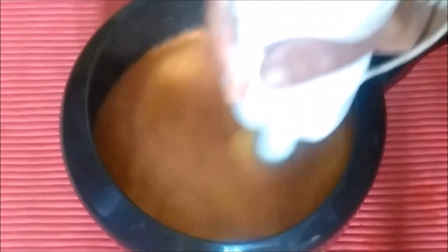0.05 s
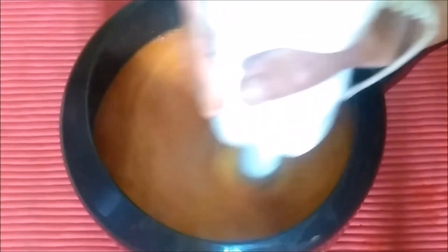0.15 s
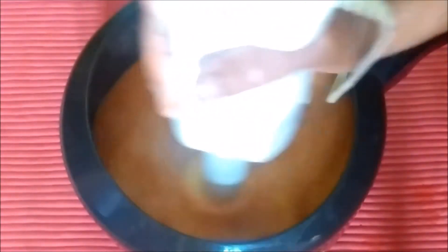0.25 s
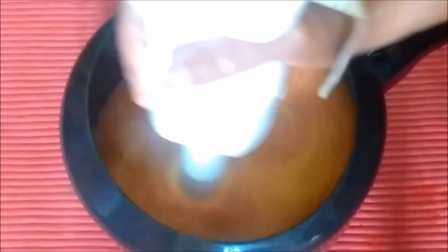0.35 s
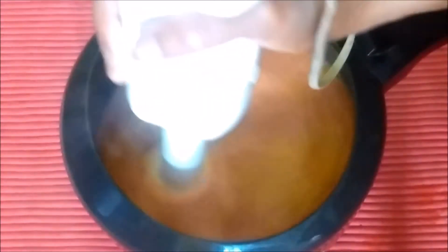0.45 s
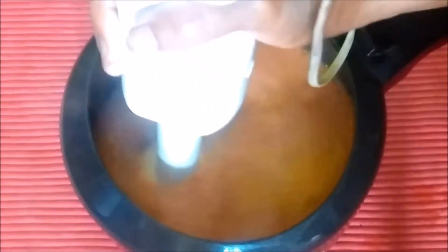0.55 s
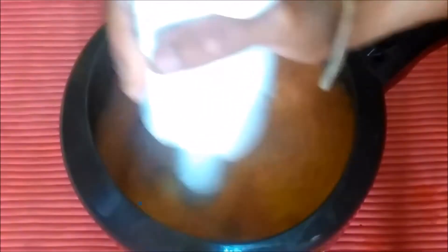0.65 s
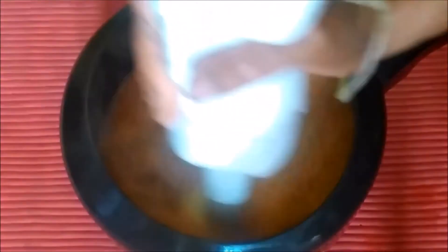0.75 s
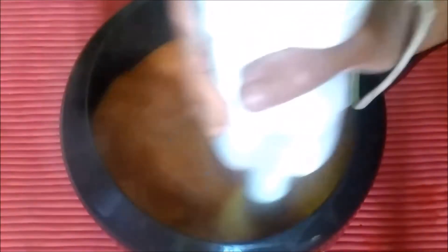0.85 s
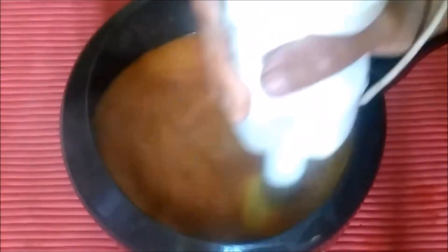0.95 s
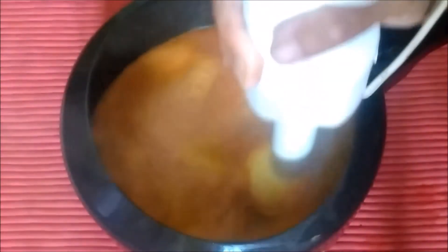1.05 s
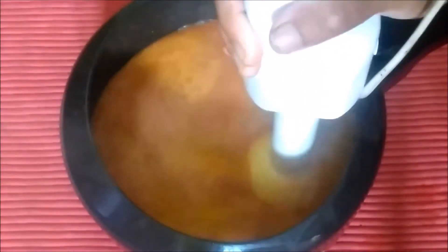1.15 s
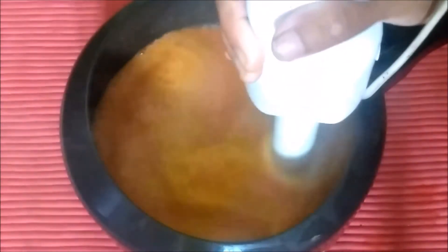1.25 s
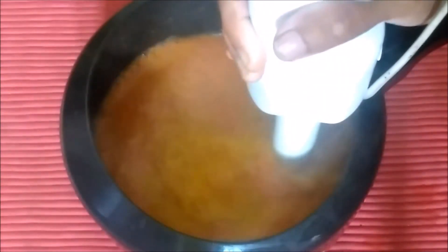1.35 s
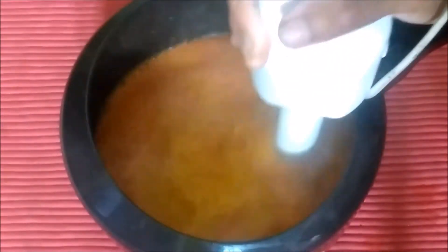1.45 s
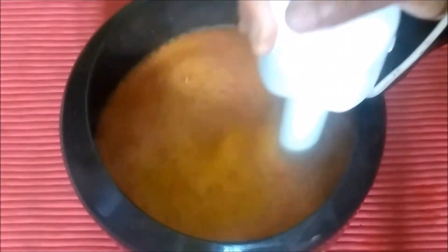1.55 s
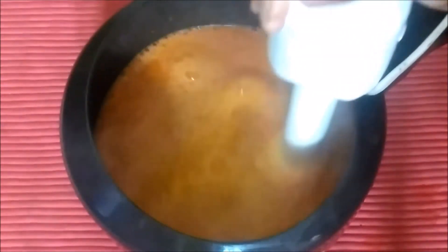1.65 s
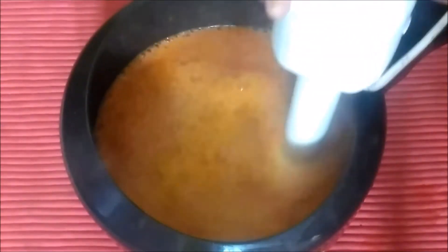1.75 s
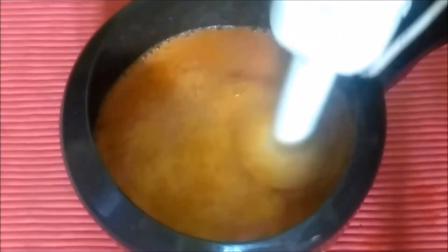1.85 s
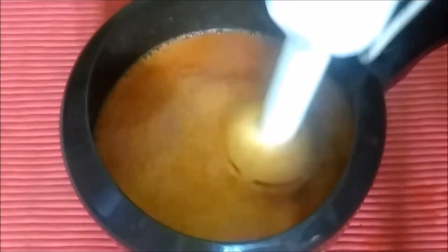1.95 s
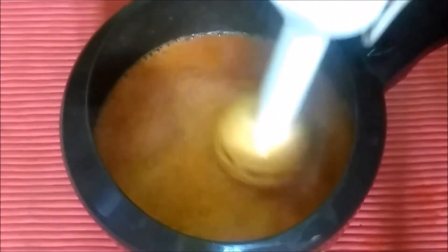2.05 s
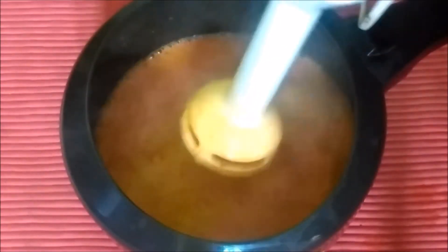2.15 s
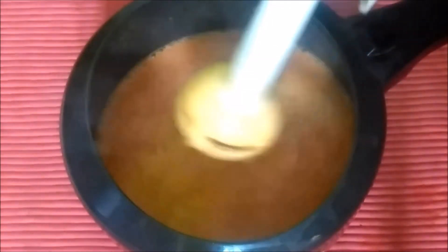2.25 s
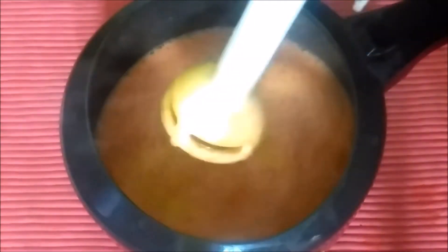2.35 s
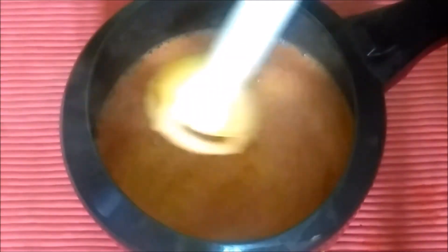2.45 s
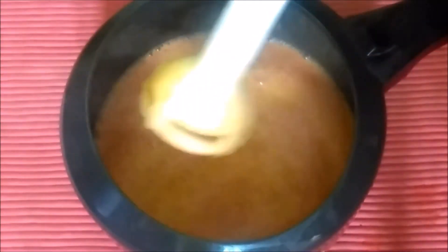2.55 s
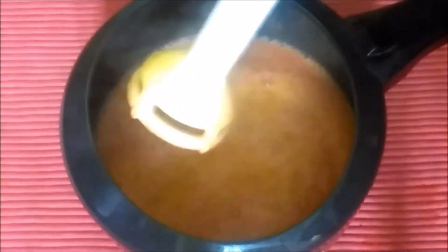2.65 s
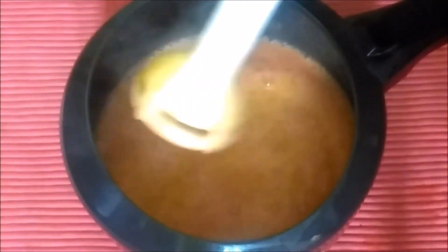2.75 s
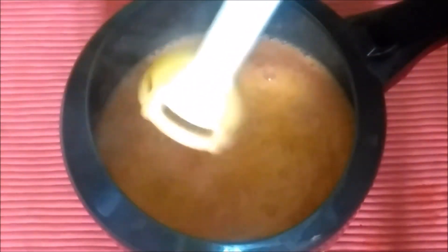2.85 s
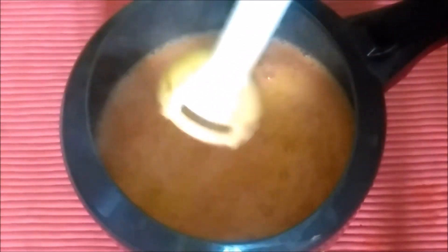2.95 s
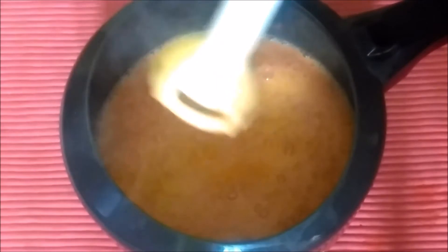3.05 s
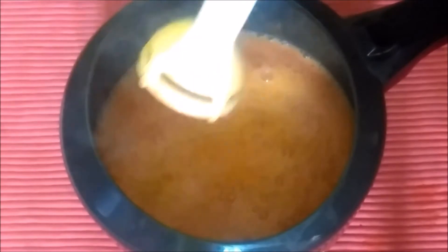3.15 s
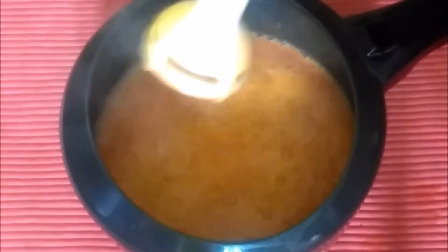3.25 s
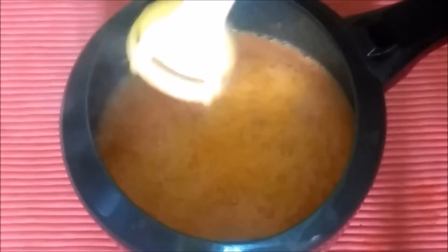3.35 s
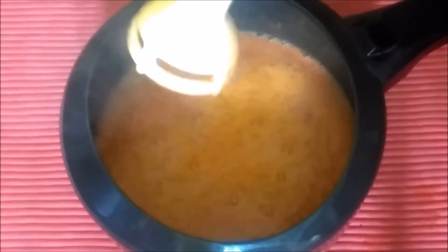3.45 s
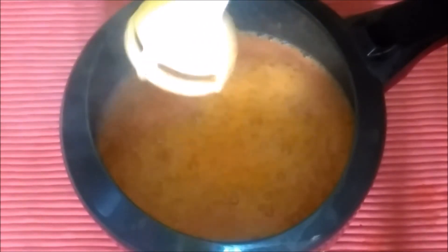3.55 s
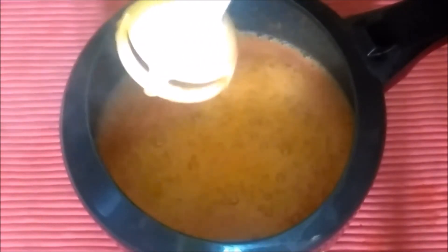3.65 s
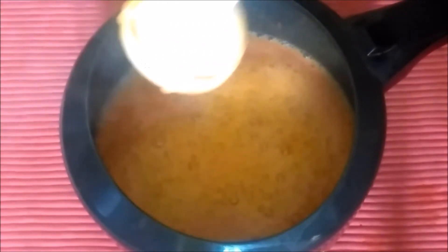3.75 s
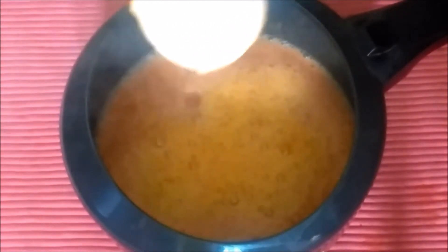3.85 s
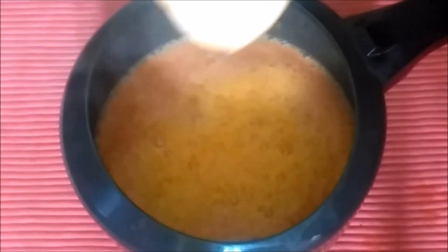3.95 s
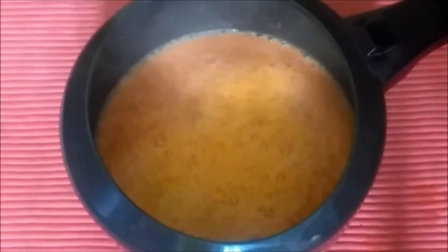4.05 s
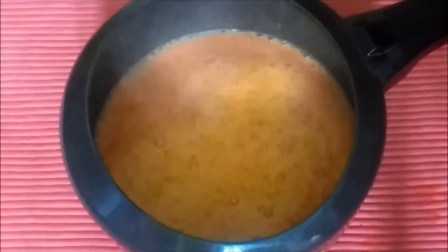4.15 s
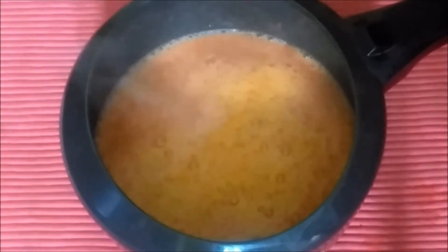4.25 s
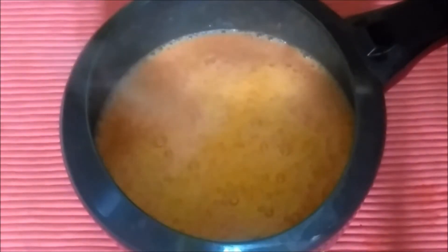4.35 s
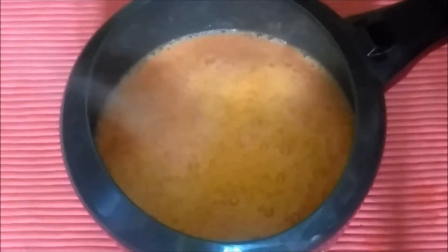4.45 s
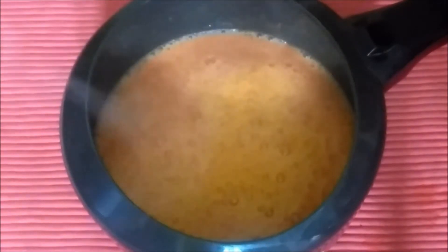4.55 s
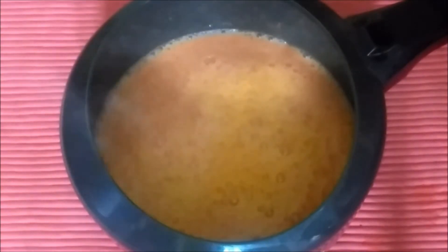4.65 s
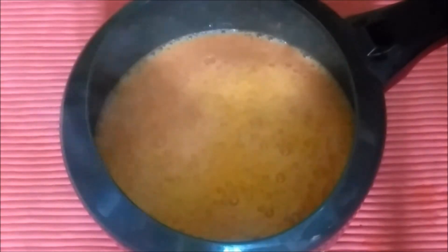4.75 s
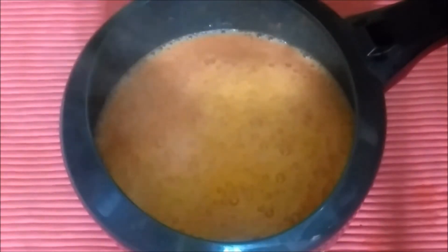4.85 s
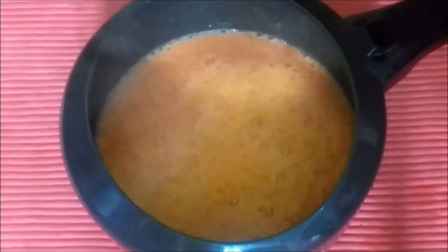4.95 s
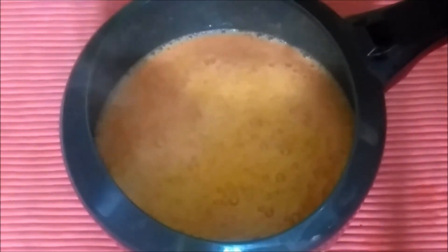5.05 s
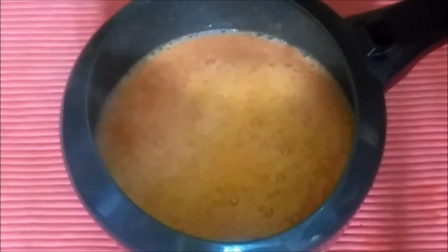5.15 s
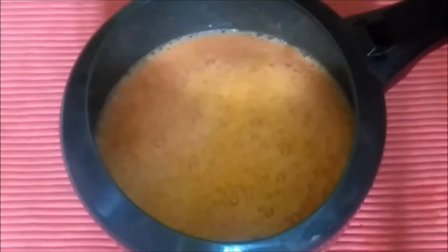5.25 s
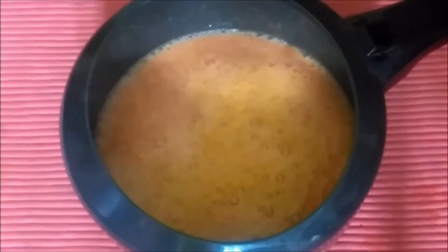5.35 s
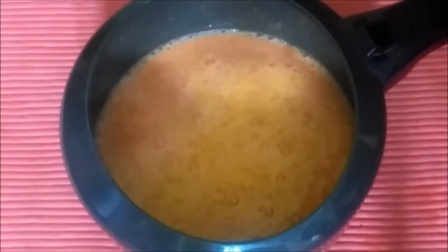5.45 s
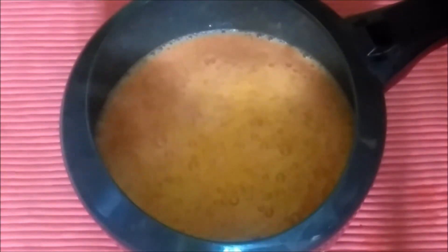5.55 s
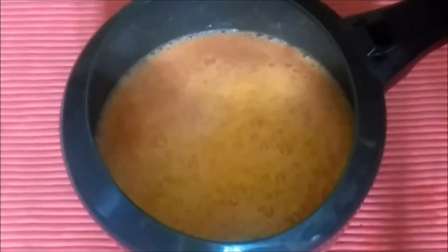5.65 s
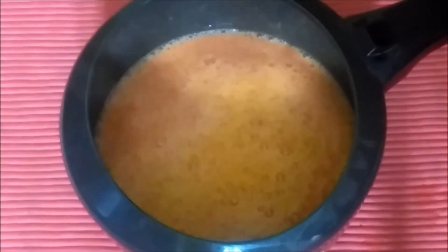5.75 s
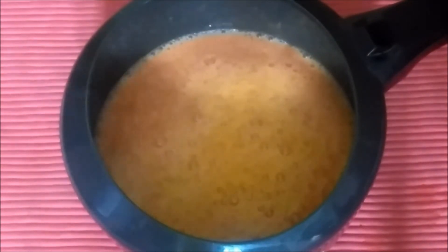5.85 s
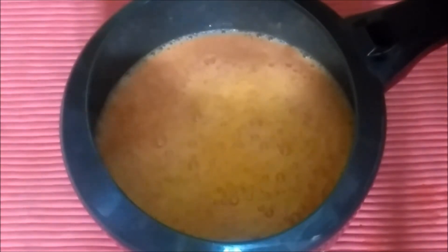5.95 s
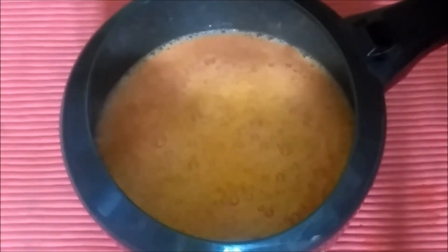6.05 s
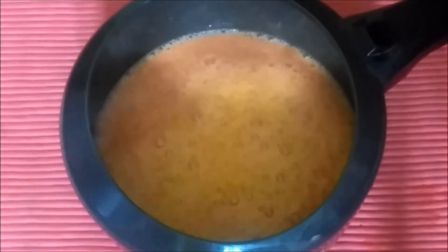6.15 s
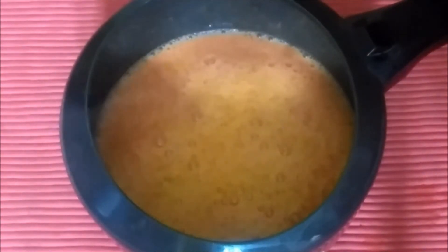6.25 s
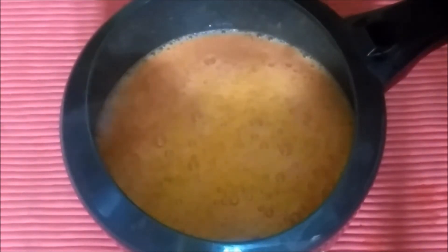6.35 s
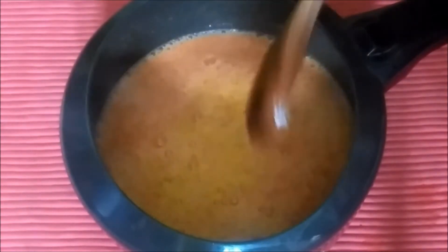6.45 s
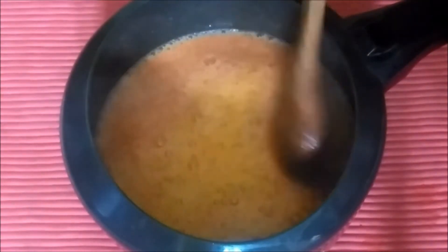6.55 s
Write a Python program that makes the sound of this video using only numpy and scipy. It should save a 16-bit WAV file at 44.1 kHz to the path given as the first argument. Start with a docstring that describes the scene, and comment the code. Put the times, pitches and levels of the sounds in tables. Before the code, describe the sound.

From the start a hand blender runs close by: a high, buzzing electric whine with brushy hiss, over low churning soup. It speeds up slightly, then labours; around 0.25-0.45 s the guard grates on the pot, with a strongest rough grind and thud near 0.65 s and small ticks around it. Another brief scrape comes at 1.2 s, and the soup quietens. At about 1.55 s the power is released; pitch and level fall quickly through a shuddering growl, gone by 2.2 s, with tiny wet plops near 2.0 s. Then it is quiet: faint air and a distant wavering drone. Dry, hissing strokes swell at 2.4-2.8, 3.1-3.6 and faintly around 4 s. A soft tap at 4.5 s precedes a sharp, bright utensil clack at 5.15 s with weak bounces to 5.45 s. Light rubs follow at 5.8 and 6.3 s. Close stereo, much brighter left.

```python
"""In a quiet kitchen a hand blender whines in a pot of soup, slowing in the heavier grinds of its guard.
Tones locked to the shaft angle and shaped noise make the motor and soup; switched off, it coasts down.
The head is lifted out (bursts ringing in resonators); dry strokes hiss (grains of friction), and a
utensil clacks and bounces on the worktop (clicks exciting decaying modes). Steady air noise and a far
drone lie behind. Two close microphone ports hear it, the left one much brighter in the treble."""
import sys
import numpy as np
from scipy import signal
from scipy.fft import rfft, irfft, next_fast_len
from scipy.io import wavfile
from scipy.ndimage import uniform_filter1d

SR = 44100
rng = np.random.default_rng(int(sys.argv[2]) if len(sys.argv) > 2 else 0)


def generate_wav(signal):
    """Clip the signal to [-1, 1] and save it as 16-bit WAV at the path in sys.argv[1]."""
    frames = np.transpose(np.atleast_2d(signal))
    scaled = np.clip(frames, -1, 1) * 32767
    pcm = np.round(scaled).astype(np.int16)
    wavfile.write(sys.argv[1], SR, pcm)


def attenuation_scalar(level_db):
    """Turn a level in dB into a linear amplitude multiplier (20 dB per decade)."""
    decades = np.asarray(level_db, float) / 20
    return 10 ** decades


N = 290619

# All levels are relative; spectra give shape only, as shaped noise is brought to rms 1.
# Spectrum of the air noise: [f/Hz, level/dB]
AIR_SPECTRUM = [(22, -40), (50, -5), (216, -9.5), (289, -13.5), (592, -21.5), (641, -9), (837, -28),
                (1210, -24), (1310, -19.5), (1960, -13.5), (2920, -13.5), (6150, -18), (6840, -4),
                (8920, -0.5), (10800, -2), (12000, -12), (14400, -16.5)]
# Far drone against time: [t/s, level/dB]
DRONE_LEVEL = [(2.2, -81), (2.42, -69), (2.52, -62), (3.1, -63), (3.75, -56), (3.9, -62), (4.66, -58.5),
               (4.9, -60.5), (5.04, -55.5), (5.1, -64), (5.3, -61.5), (5.8, -68), (6.13, -66),
               (6.22, -56.5), (6.59, -65)]
# Resonances of the drone: [f/Hz, bandwidth/Hz, level/dB]
DRONE_RESONANCES = [(589, 46, 0), (781, 53, -3.5), (910, 67, -3.5), (740, 3400, -2), (2850, 120, -1),
                    (296.5, 4.6, -10.5)]
# Utensil contacts: [t/s, level/dB, upper band edge f/Hz]
CONTACTS = [(4.489, -34, 1770), (5.1205, -23.5, 4500), (5.1416, -22, 4000), (5.1445, -9, 14000),
            (5.148, -10.5, 13840), (5.1632, -36, 12000), (5.1772, -15.5, 12300), (5.294, -19, 2500),
            (5.4, -24, 1200), (5.437, -30.5, 2200)]
# Modes of the utensil: [f/Hz, level/dB, t60/s at a 14 kHz contact]
UTENSIL_MODES = [(388, -20, 0.06), (775, -3, 0.046), (1428, -2, 0.093), (1863, 11.5, 0.052),
                 (2500, -7.5, .05), (3380, -4.5, 0.064), (4030, -5, 0.058), (4500, -21, .05),
                 (5370, 0.5, 0.062), (6070, -27, .06), (7300, -12, 0.16), (8510, -8.5, 0.15),
                 (10500, 1.5, 0.15), (11000, -8, 0.09), (11900, 2.5, 0.12), (13200, 6, 0.1)]
# Spectrum of the room tail after a contact: [f/Hz, level/dB]
TAIL_SPECTRUM = [(200, -60), (300, -34), (409, -5), (493, -18), (766, -6), (1560, 0.5), (5960, -18),
                 (10800, -13), (14400, -22)]
# Short ringing bursts: the switch clunks near 1.98 s, cavities ring as the head breaks the surface, one low
# ring at 1.2 s: [t/s, peak level/dB, f/Hz, t60/s]
PLOPS = [(1.978, -34, 1215, 0.017), (1.978, -37, 4780, 0.017), (1.979, -36, 4130, 0.023),
         (1.995, -40.5, 295, 0.13), (2.005, -42, 4300, .02), (2.03, -44, 3650, .02),
         (2.055, -47, 3200, 0.017), (1.2, -39, 197, 0.16)]
# The pot thudding under the guard: [t/s, peak level/dB, f/Hz, t60/s]
POT_THUDS = [(.472, -39, 90, 0.037), (.64, -29, 152, 0.074), (.652, -46, 70, 0.12), (1.21, -43, 192, 0.1),
             (1.715, -40.5, 132, 0.16)]
# Sliding strokes: [t/s, swell/s, hold/s, fade/s, level/dB, treble gain/dB]
STROKES = [(2.38, 0.015, 0.11, 0.16, -41.5, -26), (2.495, 0.13, 0.04, 0.15, -32, 15),
           (3.136, 0.17, 0.15, 0.14, -27.5, -7), (3.588, 0.57, 0.25, .12, -39, -9),
           (4.438, 0.043, 0.13, 0.077, -49.5, 12.5), (4.723, 0.043, 0.018, 0.09, -49, 13),
           (5.066, 0.077, 0.028, 0.22, -32, 7), (5.801, 0.047, 0.04, 0.21, -36, 11),
           (6.298, 0.11, 0.18, .1, -48, 8)]
# Spectrum of the sliding friction: [f/Hz, level/dB]
SLIDE_SPECTRUM = [(710, -73), (1200, -71), (1510, -40), (1730, -74), (1780, -53), (2150, -26),
                  (3580, -15.5), (5590, -31), (5890, -27.5), (9700, 2.5), (11500, -3), (14400, -13)]
# Narrow bands of noise within the strokes: [f/Hz, bandwidth/Hz, level/dB], before random shifts
SLIDE_BANDS = [(2180, 50, -52), (3550, 28, -27.5), (4360, 77, -30.5), (6050, 60, -26.5), (7850, 130, -22.5),
               (9510, 150, -18), (10600, 130, -12.5), (13060, 220, -24)]
# Guard grinding on the pot bottom: [t/s, length/s, level/dB]
GRINDS = [(0.264, 0.12, -25), (0.435, 0.023, -29), (0.623, 0.043, -15.5), (0.674, 0.012, -30.5),
          (0.735, 0.029, -33.5), (1.171, 0.017, -29), (1.205, 0.0061, -25.5)]
# Spectrum of the grinding: [f/Hz, level/dB]
GRIND_SPECTRUM = [(24, -55), (40, -44), (247, -17.5), (470, -20.5), (768, -8), (936, -17), (2500, -13),
                  (3900, -11.5), (6000, -11.5), (10200, -9), (14400, -16)]
# Guard ticking against the pot: [t/s, level/dB]
TICKS = [(0.23, -5), (0.27, -3), (0.477, -2), (0.633, -2), (.649, -6), (0.661, 3), (.71, -2), (0.7268, -2),
         (0.745, -5), (1.2636, 0.5)]
# Spectrum of the ticks: [f/Hz, level/dB]
TICK_SPECTRUM = [(100, -22), (2500, -16), (7000, -0.5), (10500, 7.5), (14400, -18)]
# Motor while powered: [t/s, shaft f/Hz before smoothing, blade-pass level/dB, commutator level/dB]
SHAFT = [(0, 246.2, -69, -37), (.1, 262.5, -71, -26.5), (.2, 272.5, -43, -26), (.33, 280, -29.5, -29),
         (.43, 275.5, -41, -27.5), (.53, 259.5, -47.5, -31), (.645, 239.5, -27, -24),
         (.77, 255.7, -57, -28), (.87, 267, -58, -30), (.97, 264.4, -35, -25.5), (1.07, 264, -64, -27.5),
         (1.16, 255.5, -39, -34.5), (1.22, 249.5, -28.5, -26.5), (1.29, 261.5, -39, -34),
         (1.39, 266.8, -43, -25.5), (1.48, 260, -54.5, -30), (1.562, 248, -39.5, -30)]
# Commutator harmonics, 2nd to 6th: [level/dB]
COMMUTATOR_HARMONICS = [-19, -8, 2, -5.5, 4]
# Growl at multiples of the shaft frequency: [order, level/dB]
GROWL_ORDERS = [(3, -53.5), (4, -53), (5, -49.5), (6, -50.5)]
# Noise of the work: [t/s, brush and fan hiss level/dB, churned soup level/dB]
WORK_NOISE = [(0, -20.5, -31), (.31, -21, -31.5), (.6, -18.5, -30.5), (.9, -20, -30), (1.14, -21.5, -37.5),
              (1.42, -21, -46.5), (1.6, -21, -42.5), (1.74, -25, -43), (1.85, -32.5, -61.5),
              (1.96, -38.5, -57), (2.2, -50.5, -70)]
# Spectrum of brush and fan hiss: [f/Hz, level/dB]
HISS_SPECTRUM = [(1290, -41), (2200, -57), (4720, -63), (5390, -40), (5700, -18), (7740, -1.5),
                 (8570, -1.5), (10400, 4), (11800, -7.5), (13600, -13.5), (14400, -6)]
# Spectrum of the churned soup: [f/Hz, level/dB]
CHURN_SPECTRUM = [(24, -61), (40, -18.5), (222, -20), (269, -12.5), (360, -15.5), (471, -1), (640, -1.5),
                  (780, -10), (1410, -5), (2120, -8.5), (2420, -11.5), (4000, -13), (5200, -12),
                  (8800, -120)]
# The housing growling in the run-down: [t/s, width/s, level/dB, f/Hz, bandwidth/Hz]
SHUDDERS = [(1.615, 0.028, -37.5, 467, 40), (1.67, 0.032, -39, 421, 90), (1.722, 0.027, -37, 328, 59.5),
            (1.8, 0.035, -40.5, 446, 200), (1.9, 0.039, -53.5, 400, 300)]
# Left port over right port: [f/Hz, level/dB]
LEFT_OVER_RIGHT = [(60, 1), (130, -3.5), (280, 4.5), (620, 3.5), (1350, 3), (2950, 1.5), (6420, 1),
                   (14000, 23)]
# Correlation of the ports, negative for opposite sign: [f/Hz, correlation]
PORT_CORRELATION = [(60, -0.88), (150, -0.82), (370, -0.55), (920, -0.19), (2270, -0.3), (5640, -0.11),
                    (14000, -0.26)]
# Arrival of each chain of reflections: [delay/ms]
FIRST_ECHO = (.7, 1.298)

SCATTER_FEEDBACK, SHIFTS_PER_S = 0.75, 2.47  # allpass coefficient; how fast the reflections change
SOFT_DAMPING, CRACK_LOW_HZ = 0.64, 400  # soft contacts stay on the utensil (exponent); lower band edge
STROKE_EDGE_DB, SLIDE_TOP_HZ = 21.5, 11200  # swell depth of a stroke; corner of its treble gain
SLIDE_RIGHT_DB = -4  # the strokes lie further left
# random spread of the narrow bands from stroke to stroke: share of pitch, level
BAND_SCATTER, BAND_SPREAD_DB = 0.03, 1.5
BAND_T60_WIDTHS = 2.2  # t60 times bandwidth
CHATTER_SHARPNESS = 4.8  # how short the once-a-turn contact is
SEGMENTS = 10  # commutator segments
WHINE_SIDE_DEPTH, SPEED_SMOOTH_S = 0.25, 0.065  # unevenness of the brushes in rad; rotor inertia
# after the switch is released
COAST_TURNS_PER_S2, WHINE_FADE_DB_PER_S, SHAFT_FADE_DB_PER_S = 600, 150, 160
COAST_WOBBLE = 0.05  # share of the speed


def curve(rows):
    """Linear interpolation in time: each column becomes a signal, held beyond its ends."""
    s, *columns = np.transpose(rows)
    return [np.interp(np.arange(N) / SR, s, c) for c in columns]


def rms_one(x):
    """Normalisation of power: scale to rms 1."""
    return x / np.sqrt(np.mean(x ** 2) + 1e-20)


def at_hz(points, hz):
    """Interpolation of a spectrum on a logarithmic frequency axis."""
    f, value = np.transpose(points)
    return np.interp(np.log(hz + 1), np.log(f + 1), value)


def drift(rate):
    """Low-passed noise: a slow random fluctuation of rms 1, with its corner near rate in Hz."""
    r = np.exp(-80 * np.pi * rate / SR)  # one step is 40 samples
    white = rng.standard_normal(N // 40 + 2002)
    slow = signal.lfilter([1], [1, -2 * r, r * r], white)[2000:]
    return np.interp(np.arange(N) / 40, np.arange(len(slow)), rms_one(slow))


def colour(x, spectrum, patchy_db):
    """Linear filtering: x takes a spectrum, each octave fluctuating on its own; rms 1."""
    size = next_fast_len(N)
    hz = np.arange(size // 2 + 1) * SR / size
    shaped = rfft(x, size) * attenuation_scalar(at_hz(spectrum, hz))
    octave = np.log2(hz / 30 + 1e-9)
    total = np.zeros(N)
    for k in range(10):
        band = irfft(shaped * np.clip(1 - abs(octave - k), 0, 1), size)[:N]
        total += band * attenuation_scalar(patchy_db * drift(14.6))
    return rms_one(total)


def grains(per_s, spread_db):
    """Shot noise: random impulses of uneven size and sign."""
    sizes = attenuation_scalar(spread_db * np.minimum(rng.exponential(1, N), 5)) * rng.choice([-1, 1], N)
    return sizes * (rng.random(N) < per_s / SR)


def ring(x, hz, t60):
    """Damped resonance: a unit impulse excites a decaying sine of initial height 1."""
    r, w = attenuation_scalar(-60 / (t60 * SR)), 2 * np.pi * hz / SR
    return signal.lfilter([0, np.sin(w)], [1, -2 * r * np.cos(w), r * r], x + 1e-18)


def scattered(x):
    """Multiple reflection off pot and hands: two allpass chains, their blend wandering as things move."""
    size = next_fast_len(N + SR // 4)
    turn = np.exp(-2j * np.pi * np.arange(size // 2 + 1) / size)  # delay of one sample
    chains = turn ** (np.reshape(FIRST_ECHO, (-1, 1)) * SR // 1000)
    for lags in rng.uniform(0.5, 5, (4, 2, 1)) * SR // 1000:  # drawn in ms
        echo = turn ** lags
        chains = chains * (echo - SCATTER_FEEDBACK) / (1 - SCATTER_FEEDBACK * echo)
    one, other = irfft(rfft(x, size) * chains, size)[:, :N]
    blend = 1.44 * drift(SHIFTS_PER_S)
    return np.cos(blend) * one + np.sin(blend) * other


def kitchen():
    """Broadband and resonant noise: steady air, and a far drone of narrow wavering resonances."""
    air = attenuation_scalar(-50) * colour(rng.standard_normal(N), AIR_SPECTRUM, patchy_db=1.76)
    level_db, = curve(DRONE_LEVEL)
    drone = np.zeros(N)
    for hz, width, db in DRONE_RESONANCES:
        tone = rms_one(ring(rng.standard_normal(N), hz, 2.1 / width))
        drone += attenuation_scalar(db + 2.8 * drift(7.5)) * tone
    return air + attenuation_scalar(level_db - 6.5) * drone


def knocks():
    """Modal impact: each contact, duller if softer, excites all modes and a crack; a room tail decays."""
    out, tail = np.zeros(N), np.zeros(N)
    span = SR // 2
    age = np.arange(span) / SR
    for s, db, hz in CONTACTS:
        at, brightness = round(s * SR), hz / 14000
        click = np.zeros(span)
        click[0] = attenuation_scalar(db - 18.0)
        struck = np.zeros(span)
        for mode_hz, level_db, t60 in UTENSIL_MODES:
            strength = attenuation_scalar(level_db + rng.normal(0, 5.0))
            struck += strength * ring(click, mode_hz, t60 * brightness ** SOFT_DAMPING)
        struck += attenuation_scalar(db - 7.0) * rng.standard_normal(span) * np.exp(-age / (0.0077 * brightness))  # crack
        edges = [CRACK_LOW_HZ, min(hz, 0.45 * SR)]
        soft = signal.butter(2, edges, "band", fs=SR, output="sos")
        out[at:at + span] += signal.sosfilt(soft, struck)
        tail[at:at + span] += attenuation_scalar(db - 24) * attenuation_scalar(-60 * age / 0.27) * brightness
    return out + tail * colour(rng.standard_normal(N), TAIL_SPECTRUM, patchy_db=1.5)


def plops(rows):
    """Cavity resonance: a short burst of noise excites one decaying mode per row."""
    out, span = np.zeros(N), SR // 4
    for s, db, hz, t60 in rows:
        burst = rng.standard_normal(span) * np.exp(-np.arange(span) / (0.0042 * SR))
        rings = ring(burst, hz, t60)
        at = round(s * SR)
        out[at:at + span] += attenuation_scalar(db) * rings / abs(rings).max()
    return out


def slides():
    """Dry friction: dense grains hiss, with narrow bands shifted at random per stroke; strokes swell and fade."""
    t, out = np.arange(N) / SR, np.zeros(N)
    rub = rng.standard_normal(N) + 0.5 * grains(2400, 1.7)
    hiss = attenuation_scalar(-5.5) * colour(rub, SLIDE_SPECTRUM, patchy_db=-0.5)
    high_pass = signal.butter(4, SLIDE_TOP_HZ, "high", fs=SR, output="sos")
    top = signal.sosfilt(high_pass, hiss)
    flicker = [attenuation_scalar(2.6 * drift(21)) for _ in SLIDE_BANDS]
    draws = rng.standard_normal((len(STROKES), 2, len(SLIDE_BANDS)))
    edge_drops = np.array([60, STROKE_EDGE_DB, 0, 0, STROKE_EDGE_DB, 60])
    for (s, swell, hold, fade, db, treble_db), (shift, strength) in zip(STROKES, draws):
        times = np.cumsum([s - 0.03, 0.03, swell, hold, fade, 0.03])
        part = slice(int(times[0] * SR), int(times[-1] * SR))
        level = attenuation_scalar(np.interp(t[part], times, db - edge_drops))
        stroke = hiss[part] + (attenuation_scalar(treble_db) - 1) * top[part]
        for k, (hz, width, band_db) in enumerate(SLIDE_BANDS):
            band = ring(rub[part], hz * (1 + BAND_SCATTER * shift[k]), BAND_T60_WIDTHS / width)
            stroke += attenuation_scalar(band_db + BAND_SPREAD_DB * strength[k]) * flicker[k][part] * rms_one(band)
        out[part] += level * stroke
    return out


def grinding(angle):
    """Periodic contact: the guard chatters mostly once per turn; lone ticks die in a few ms."""
    t = np.arange(N) / SR
    contact = np.exp(CHATTER_SHARPNESS * (np.cos(angle) - 1))
    chatter = rng.standard_normal(N) * (0.63 + contact * 1.23 * attenuation_scalar(2.6 * drift(60)))
    press, ticks = np.zeros(N), np.zeros(N)
    for s, length, db in GRINDS:
        release = attenuation_scalar(-300 * np.maximum(t - s - length, 0))
        press += attenuation_scalar(db) * np.clip((t - s) / 0.0048, 0, 1) * release
    for s, db in TICKS:
        ticks += attenuation_scalar(db - 7.5) * (t >= s) * np.exp(-np.maximum(t - s, 0) / 0.0029)
    ground = press * colour(chatter, GRIND_SPECTRUM, patchy_db=2.0)
    return ground + ticks * colour(rng.standard_normal(N), TICK_SPECTRUM, patchy_db=4.3)


def motor():
    """Rotating source: tones locked to the shaft angle, hiss pulsing with the blades, soup churning."""
    t = np.arange(N) / SR
    turns, blade_db, whine_db = curve(SHAFT)
    hiss_db, churn_db = curve(WORK_NOISE + [(WORK_NOISE[-1][0] + 0.046, -90, -90)])
    off = np.maximum(t - SHAFT[-1][0], 0)  # time since the switch was released
    smooth_turns = uniform_filter1d(turns, int(SPEED_SMOOTH_S * SR))
    turns = np.maximum(smooth_turns - COAST_TURNS_PER_S2 * off, 0)
    wobble = 0.00085 * drift(28.3)
    wobble += COAST_WOBBLE * np.minimum(off / 0.238, 1) ** 2 * drift(23.0)
    angle = 2 * np.pi * np.cumsum(turns * (1 + wobble)) / SR

    blade = attenuation_scalar(blade_db - SHAFT_FADE_DB_PER_S * off)
    tones = blade * attenuation_scalar(4.5 * drift(32)) * np.sin(2 * angle + 0.86 * drift(44))  # two passes per turn
    tones += attenuation_scalar(-50.5 + 0.7 * (churn_db + 31.0) + 2.0 * drift(1.9)) * np.sin(angle)
    for harmonic, db in enumerate(COMMUTATOR_HARMONICS, 2):
        level_db = whine_db + db - WHINE_FADE_DB_PER_S * off + 2.94 * drift(21) + 0.69 * drift(0.97)
        phase = harmonic * SEGMENTS * angle + WHINE_SIDE_DEPTH * np.sin(angle)
        tones += attenuation_scalar(level_db) * np.sin(phase)
    for order, db in GROWL_ORDERS:
        level_db = db + 0.58 * (churn_db + 35.5) + 1.9 * drift(22)
        tones += attenuation_scalar(level_db) * np.sin(order * angle + 1.9 * drift(37))

    sparks = rng.standard_normal(N) * (1 + 0.14 * np.sin(2 * angle)) + 0.34 * grains(1100, 3.1)
    hiss = attenuation_scalar(hiss_db - 2.0) * colour(sparks, HISS_SPECTRUM, patchy_db=1.18)
    splashes = rng.standard_normal(N) + 0.9 * grains(900, 3.74)
    churn = attenuation_scalar(churn_db - 1.0) * colour(splashes, CHURN_SPECTRUM, patchy_db=2.52)
    growl = np.zeros(N)
    for s, width, db, hz, band in SHUDDERS:
        housing = rms_one(ring(rng.standard_normal(N), hz, 3.8 / band))
        growl += attenuation_scalar(db) * np.exp(-((t - s) / width) ** 2) * housing
    return growl + np.sqrt(2) * tones + hiss + churn + grinding(angle)


def scene():
    """Superposition: the feeds of the left and right ports, differing only in the level of the strokes."""
    common = kitchen() + knocks() + plops(PLOPS) + plops(POT_THUDS) + motor()
    return np.tile(common, (2, 1)) + attenuation_scalar(np.array([[0], [SLIDE_RIGHT_DB]])) * slides()


def roll_off(x):
    """The treble ends steeply here."""
    return signal.sosfilt(signal.butter(12, 14350, fs=SR, output="sos"), x)


def record(dry):
    """Partial coherence: the right port hears a duller, partly inverted copy plus scattered sound."""
    size = next_fast_len(N + SR // 10)
    hz = np.arange(size // 2 + 1) * SR / size
    alike = np.clip(at_hz(PORT_CORRELATION, hz), -0.99, 0.99)
    right = attenuation_scalar(-at_hz(LEFT_OVER_RIGHT, hz))
    port = 2 / np.sqrt(1 + 2 * alike * right + right ** 2)  # the mean of both ports keeps the source level
    direct = alike * rfft(dry[1], size)
    diffuse = np.sqrt(1 - alike ** 2) * rfft(scattered(dry[1]), size)
    spectra = port * np.array([rfft(dry[0], size), right * (direct + diffuse)])
    pair = irfft(spectra, size)[:, :N]
    low_pass = signal.cheby2(14, 60, 14900, fs=SR, output="sos")
    mix = np.clip(signal.sosfilt(low_pass, pair), -1, 1)
    return roll_off(mix)


dry = scene()
out = record(dry)
generate_wav(out)
```